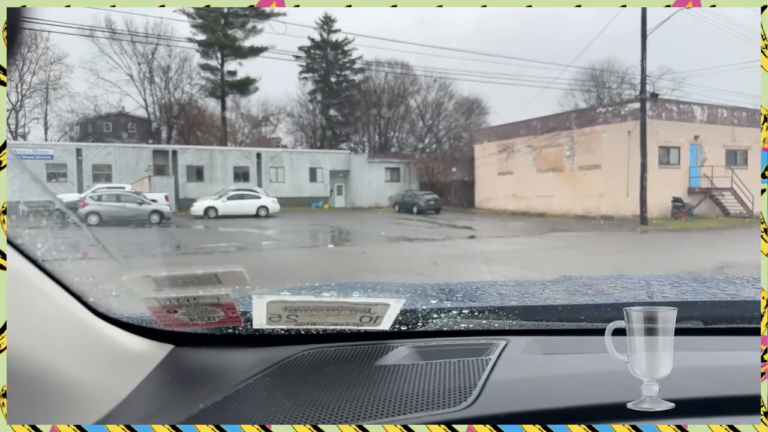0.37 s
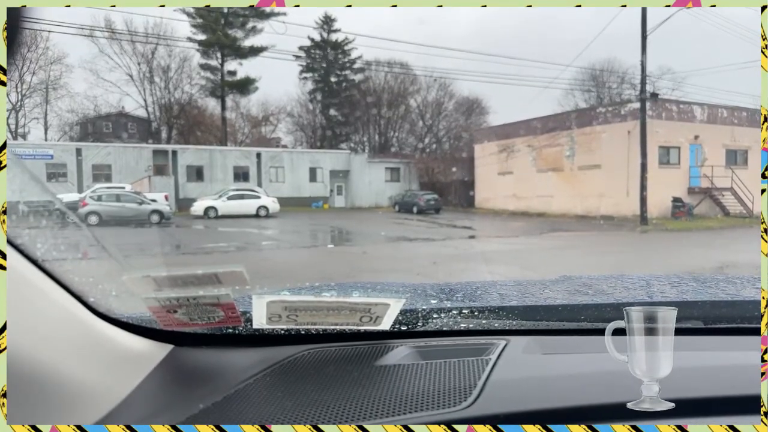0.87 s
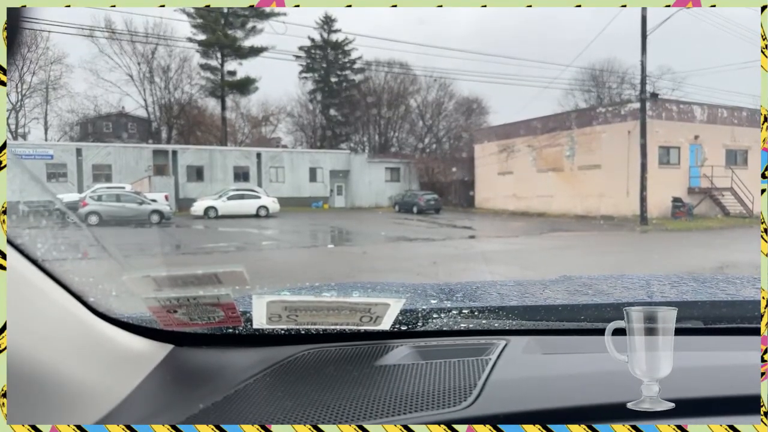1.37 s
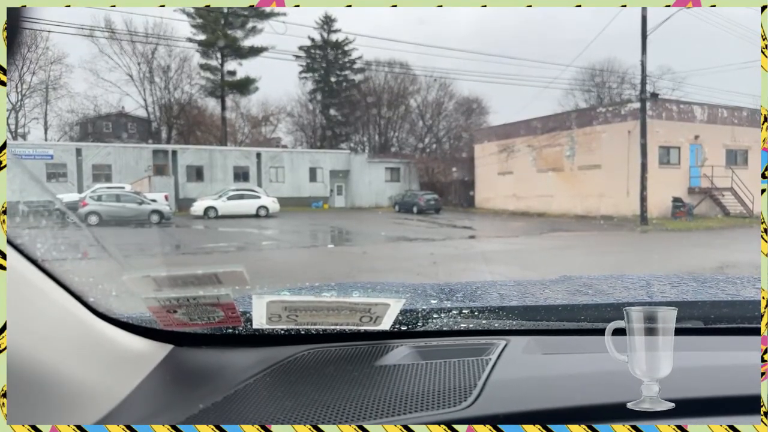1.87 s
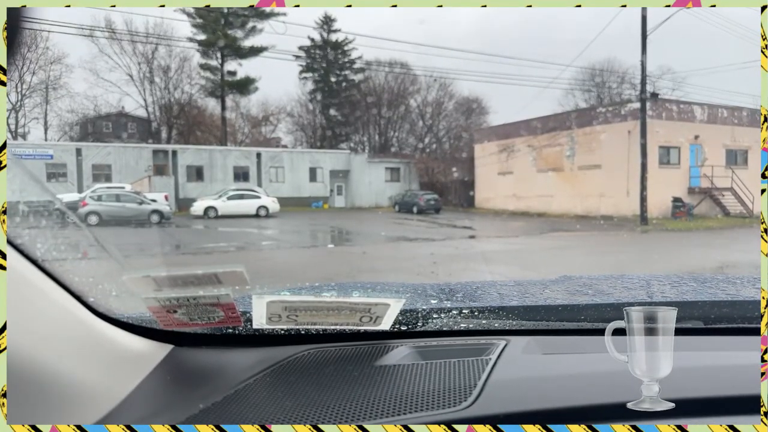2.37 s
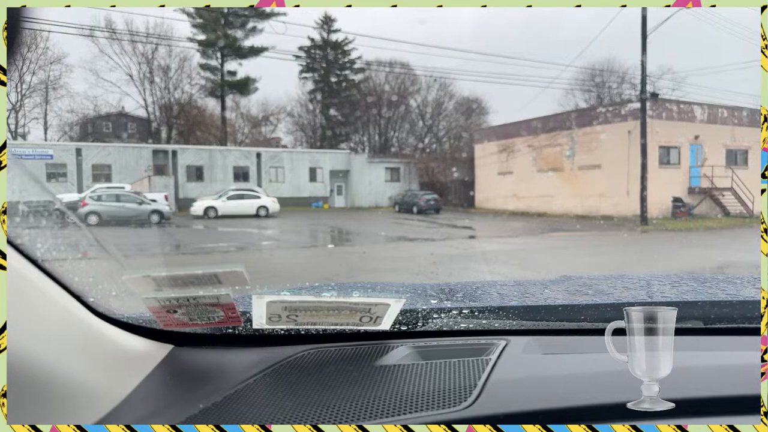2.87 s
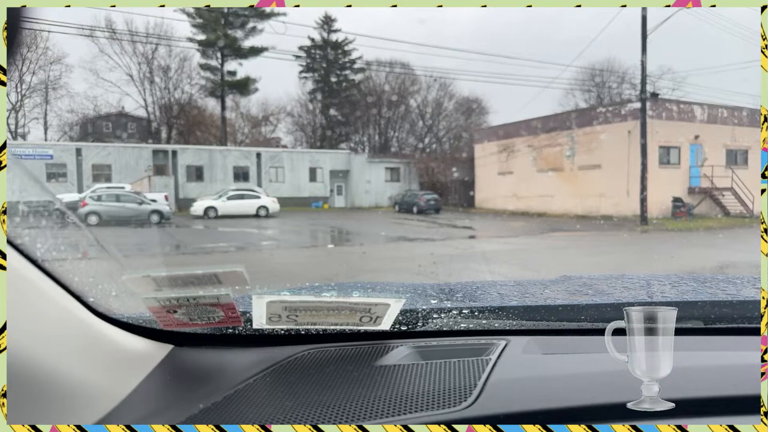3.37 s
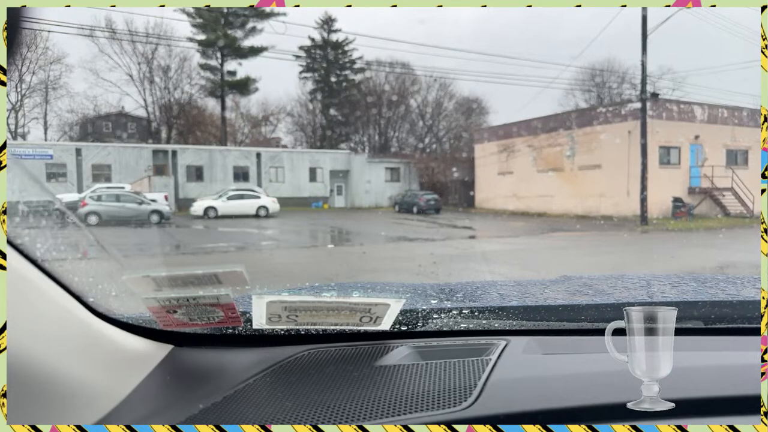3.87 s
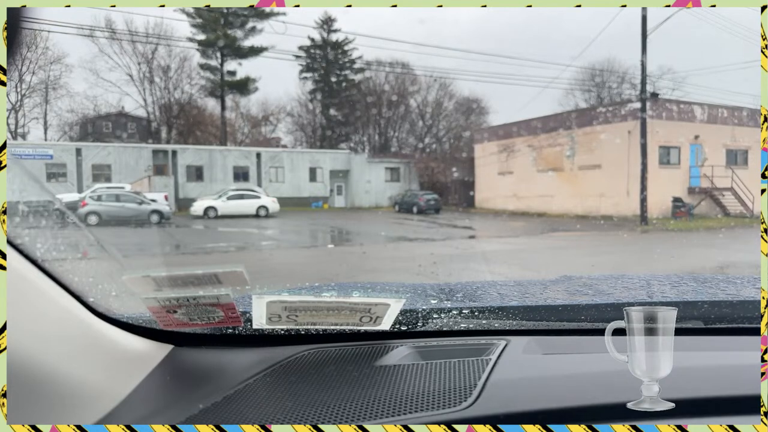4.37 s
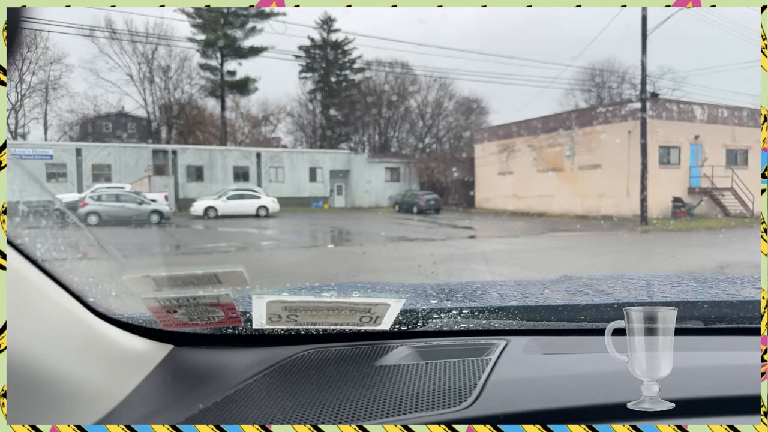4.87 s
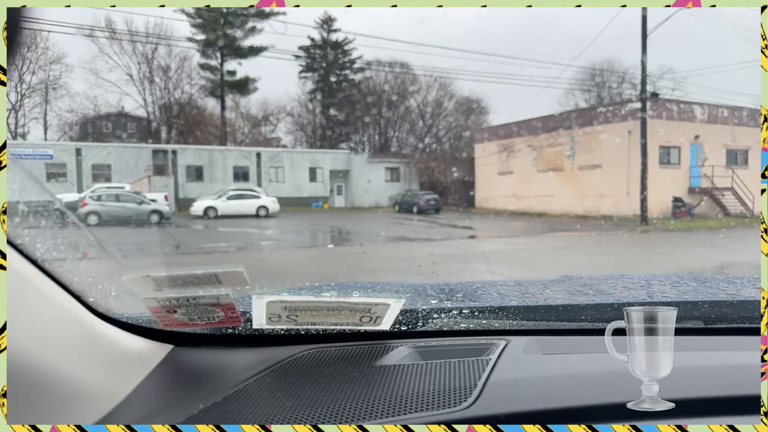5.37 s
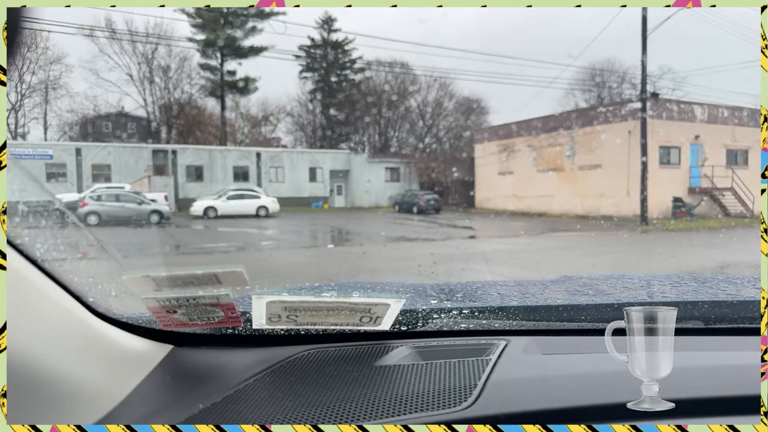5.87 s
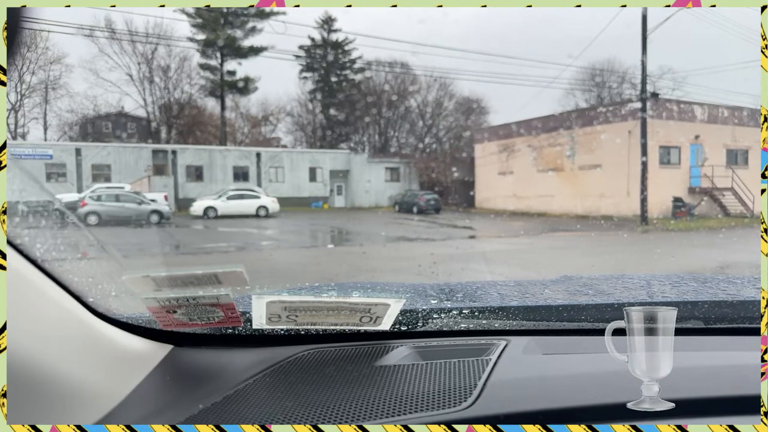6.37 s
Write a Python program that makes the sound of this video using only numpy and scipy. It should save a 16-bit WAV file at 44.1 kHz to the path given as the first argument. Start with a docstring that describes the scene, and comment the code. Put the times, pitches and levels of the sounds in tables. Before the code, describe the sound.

Heard from inside a small, padded car cabin, a deep engine idle hums throughout over dull rumble. Light rain patters very faintly on roof and glass, with scattered bigger drops. From about two seconds a stiff jacket rustles, scuffs and briefly squeaks close to the phone microphone, then eases into shorter strokes. A sharp, bright drop cracks near five and a half seconds.

```python
"""A deep firing drone with a few orders over a dull rumble: an engine idles, heard inside a parked car.
Light rain patters faintly on roof and glass as clicked panel modes; bigger drops tap those modes
together and tick as bursts of bright noise. Near the microphone a stiff jacket rustles, scuffs and
squeaks in short strokes of grainy noise and resonances; once a thin whine of ringing noise flickers."""
import sys
import numpy as np
from scipy import signal
from scipy.io import wavfile

SR = 44100
rng = np.random.default_rng(int(sys.argv[2]) if len(sys.argv) > 2 else 0)


def unload_wav(signal):
    """Save mono or channel-first audio to the path in sys.argv[1] as 16-bit WAV at rate SR, clipped to [-1, 1]."""
    wavfile.write(
        sys.argv[1],
        SR,
        np.round(np.clip(np.atleast_2d(signal).T, -1, 1) * 32767).astype(np.int16),
    )


def level_to_linear(level):
    """Convert decibel levels to linear amplitude factors, elementwise."""
    exponent = np.asarray(level, float) / 20
    return 10 ** exponent


N = 286870

# modes of the roof and glass panels: (frequency [Hz], t60 [s])
PANEL_MODES = [(62, .15), (108, 0.11), (150, 0.12), (240, 0.032), (300, .04), (370, 0.05), (445, 0.03),
               (620, 0.032), (680, .025), (750, .045), (880, 0.015), (1015, 0.03), (1150, 0.015),
               (1300, 0.02), (1500, 0.022), (1650, .015), (1800, 0.018), (2050, 0.014), (2300, 0.025),
               (2750, 0.02), (3100, 0.02), (3700, 0.0081), (4400, 0.012), (4750, .016), (5050, 0.02),
               (5350, 0.018), (5600, 0.016), (5850, .012), (6200, 0.011)]


def rms_one(x):
    """Scale to unit rms."""
    return x / np.sqrt(np.mean(x ** 2) + 1e-20)


def in_time(rows):
    """Columns of a table as curves over all samples."""
    s, *columns = np.transpose(rows)
    return [np.interp(np.arange(N) / SR, s, column) for column in columns]


def drift(rate):
    """Slow chance of spread 1: noise smoothed by two poles, computed at every 40th sample."""
    pole = np.exp(-80 * np.pi * rate / SR)
    noise = rng.standard_normal(N // 40 + 2002)
    slow = signal.lfilter([1], [1, -2 * pole, pole * pole], noise)[2000:]
    return np.interp(np.arange(N) / 40, np.arange(len(slow)), rms_one(slow))


def bands(spectrum, source, flicker_db, flicker_rate, count=3):
    """Slices (count per octave) of two unrelated sources, each with its colour and flicker: (Hz, slice)."""
    hz, db = np.transpose(spectrum)
    top_hz = min(hz[-1], 16500)
    edges = np.geomspace(hz[0], top_hz, int(count * np.log2(hz[-1] / hz[0])))
    for k, (low, high) in enumerate(zip(edges, edges[1:])):
        mid = np.sqrt(low * high)
        band = signal.butter(2, [low, high], "band", fs=SR, output="sos")
        cut = signal.sosfilt(band, source[k % 2])
        colour_db = np.interp(np.log(mid), np.log(hz), db)
        yield mid, cut * level_to_linear(colour_db + flicker_db * drift(flicker_rate))


def ring(push, hz, t60):
    """One decaying mode; a unit click gives a sine that starts at height 1."""
    r, w = level_to_linear(-60 / (t60 * SR)), 2 * np.pi * hz / SR
    return signal.lfilter([0, np.sin(w)], [1, -2 * r * np.cos(w), r * r], push + 1e-18)


def swell(s, rise, fall, db):
    """Strokes that rise to a peak and fall, summed in power, as a gain over all samples."""
    roundness = 1.5      # 1 = pointed stroke, 2 = bell-shaped
    t = np.arange(0, N + 40, 40) / SR
    shape_db = db - 20 * np.where(t < s, (s - t) / rise, (t - s) / fall) ** roundness
    return np.interp(np.arange(N) / SR, t, np.sqrt(np.sum(level_to_linear(2 * shape_db), axis=0)))


def engine():
    """Firing orders as sines; uneven combustion makes the upper ones waver."""
    # the revs jump once and settle while the drone sinks: (time [s], firing rate [Hz], drone level [dB])
    idle = [(0, 26.8, -38.3), (.5, 26.9, -39.5), (1.25, 27, -38.6), (1.75, 27.3, -39.8), (2.0, 28.7, -39),
            (2.5, 27.8, -41.2), (3.0, 27.7, -40.5), (3.5, 27.2, -43), (3.75, 27.5, -41.3),
            (4.1, 26.9, -42.5), (4.6, 27.3, -41.7), (5.0, 26.8, -42.3), (5.5, 26.7, -43.7),
            (6.0, 27.1, -42.7), (6.5, 27.1, -43)]
    # engine orders: (multiple of the firing rate, level re the first [dB], waver [dB]);
    # a positive waver dips further than it swells, a negative one the reverse
    orders = [(1, 0, -1), (1.5, -20.5, 2), (2, -13.5, 2.5), (3, -26.5, 6), (4, -28, 3), (5, -25, 1.5),
              (6, -31, -1), (7, -37.5, 2)]
    hz, db = in_time(idle)
    turn = 2 * np.pi * np.cumsum(hz) / SR
    out = 0
    for multiple, order_db, waver_db in orders:
        wander = .25 * (multiple - 1) * drift(1.08) + rng.uniform(0, 2 * np.pi)
        level = level_to_linear(order_db + waver_db * np.clip(drift(4.0), -3, 1.5))
        out = out + level * np.sin(multiple * turn + wander)
    return np.sqrt(2) * level_to_linear(db) * out


def rumble():
    """Body panels and vents pass the engine's noise into the cabin, with a rough hum."""
    # colour of cabin rumble and vent hiss: (frequency [Hz], relative level per Hz [dB])
    colour = [(22, -15.5), (38, -7.5), (50, -1), (70, -13), (100, -10.5), (146, -14.5), (210, -16.5),
              (290, -20.5), (367, -21.5), (499, -32), (580, -24), (650, -28), (750, -29), (850, -35),
              (970, -37), (1055, -48), (1170, -36), (1330, -42), (1620, -45), (2030, -42), (2320, -44),
              (2600, -48), (2990, -50.5), (8890, -58.5), (16000, -69.5)]
    # rumble and hiss together: (time [s], level [dB])
    rumble_level = [(0, -57), (1.5, -56), (3, -55.5), (4.5, -56.5), (6.5, -54.5)]
    # a hum under the bonnet that sinks away when the revs jump: (time [s], level [dB])
    hum_level = [(0, -68.5), (.9, -68.5), (1.7, -66.5), (2.0, -74), (2.3, -87), (6.5, -80.5)]
    hum_hz, hum_t60_s = 364.5, 0.044
    slices = bands(colour, rng.standard_normal((2, N)), flicker_db=2.05, flicker_rate=4.7, count=6)
    noise = rms_one(sum(cut for hz, cut in slices))
    once = ring(rng.standard_normal(N), hum_hz, hum_t60_s)
    hum = rms_one(ring(once, hum_hz, hum_t60_s))
    return level_to_linear(in_time(rumble_level)[0]) * noise + level_to_linear(in_time(hum_level)[0]) * hum


def patter():
    """Faint drops, too many to count, each ringing one panel mode picked by chance."""
    drops_per_s, least_db = 300.0, -85
    falls = rng.random(N) < drops_per_s / SR
    small = falls * level_to_linear(least_db + 2.5 * np.minimum(rng.exponential(1, N), 4))
    lands = rng.integers(5, 18, N)      # only the modes from 370 to 2050 Hz
    return sum(ring(small * (lands == k), *mode) for k, mode in enumerate(PANEL_MODES))


def cabin(x):
    """Small upholstered space: a short, dense tail, thin in the bass."""
    t60_s = 0.085
    t = np.arange(SR // 4) / SR
    thin = signal.lfilter([1, -.9], [1, -.6], rng.standard_normal(len(t)))
    tail = thin * level_to_linear(-60 * t / t60_s) * (t > .002)
    return signal.fftconvolve(x, tail / np.sqrt(np.sum(tail ** 2)))[:N]


def jacket():
    """Fibres slipping over fibres: dense tiny snaps; each stroke swells, dies and has its own dullness."""
    # cloth colour: (frequency [Hz], relative level per Hz [dB])
    colour = [(410, 3), (700, -21), (1230, -20.5), (1310, -12), (1770, -14), (2160, -16), (2900, -9),
              (3500, -5.5), (4300, -6), (5300, -4), (6300, -5.5), (7200, -6), (8200, -3), (9000, -1.5),
              (10000, -4), (10700, -5), (11500, -4), (12500, -3.5), (13500, -3), (15000, -3), (16000, -6)]
    # strokes: (time of peak [s], rise by 20 dB [s], fall by 20 dB [s], hiss level [dB], dullness [dB])
    strokes = [(0.521, 0.627, 0.18, -78.8, -1.2), (0.824, 0.115, 0.12, -81.2, 1.2),
               (0.993, 0.052, 0.438, -83.4, 0.4), (1.523, 0.22, 0.613, -80.7, 0.8),
               (1.627, 0.086, 0.044, -74.0, -1.8), (1.725, 0.161, 0.22, -72.9, 0.3),
               (1.831, 0.092, 0.043, -69.7, -0.8), (1.9, 0.345, 0.488, -81.0, -0.6),
               (2.108, 0.044, 0.045, -68.7, -0.4), (2.17, 0.026, 0.037, -74.1, -1.6),
               (2.252, 0.162, 0.033, -76.2, -4.4), (2.386, 0.148, 0.116, -80.8, 0.1),
               (2.476, 0.028, 0.079, -61.6, 0.1), (2.598, 0.151, 0.055, -66.8, -3.9),
               (2.693, 0.1, 0.44, -66.8, -2.6), (2.82, 0.06, 0.044, -62.5, 0.5),
               (2.867, 0.029, 0.059, -61.3, -1.3), (2.961, 0.09, 0.043, -59.1, -3.8),
               (3.053, 0.168, 0.032, -64.3, -2.1), (3.13, 0.068, 0.164, -69.5, 0.5),
               (3.275, 0.066, 0.197, -65.8, 1.1), (3.339, 0.223, 0.041, -64.7, -5.7),
               (3.585, 0.112, 0.143, -56.6, -4.0), (3.699, 0.205, 0.025, -65.8, -11.9),
               (3.79, 0.09, 0.106, -66.5, -0.7), (4.039, 0.4, 0.886, -82.9, -0.1),
               (4.385, 0.11, 0.351, -82.9, 4.0), (4.587, 0.02, 0.181, -71.6, -3.9),
               (4.71, 0.108, 0.095, -64.6, -5.0), (4.812, 0.12, 0.187, -76.2, 3.2),
               (4.955, 0.072, 0.134, -72.1, -1.0), (5.051, 0.044, 0.268, -77.4, 1.1),
               (5.244, 0.075, 0.136, -72.0, -4.5), (5.305, 0.055, 0.044, -72.2, -4.7),
               (5.415, 0.1, 0.1, -80, -3), (5.503, 0.05, 0.04, -80, 11), (5.506, 0.033, 0.406, -68.6, 0.1),
               (5.63, 0.134, 0.134, -75.5, -18.5), (5.74, 0.058, 0.123, -68.9, -12.4),
               (6.002, 0.041, 0.189, -83.1, 0.1), (6.122, 0.054, 0.068, -74.7, 2.4),
               (6.359, 0.412, 0.548, -88.5, 4.6)]
    s, rise, fall, db, dull_db = np.transpose(strokes)[:, :, None]
    snaps = rng.standard_normal((2, N)) * level_to_linear(3.2 * np.minimum(rng.exponential(1, (2, N)), 5))
    slices = list(bands(colour, snaps, flicker_db=1.6, flicker_rate=30.0, count=5))

    def level(colour_db):
        return swell(s, rise, fall, db + colour_db)

    def part(low_hz, high_hz):
        return rms_one(sum(cut for hz, cut in slices if low_hz <= hz < high_hz))

    hiss = level(0) * part(6500, 11000)
    sizzle = level(-1.8 - .12 * dull_db) * part(11000, 2e4)
    swish = level(dull_db) * part(2800, 6500)
    # the bottom of the cloth grows more slowly than the hiss, from -70 dB
    rub = level(-1.8 + .95 * dull_db - .45 * (db + 70)) * part(0, 2800)
    return level_to_linear(1.1 * drift(120.0)) * (hiss + sizzle + swish + rub + scuffs(part))


def scuffs(part):
    """A sleeve scuffs the seat, dull and rough: low cloth noise that catches unevenly."""
    # scuffs: (time of peak [s], rise by 20 dB [s], fall by 20 dB [s], level [dB], lowest frequency [Hz])
    scuff_rows = [(1.78, .45, .3, -77, 1600), (2.81, .14, .08, -70, 900), (3.64, .3, .15, -75, 1450),
                  (3.8, .05, .1, -76, 1450), (4.7, .07, .1, -76, 1450), (4.965, .04, .04, -79, 1450),
                  (5.5, .07, .035, -69, 1300), (5.71, .05, .05, -75, 1050)]
    catch = level_to_linear(4.0 * drift(150.0))      # 4 dB of grain
    out = 0
    for *stroke, low_hz in scuff_rows:
        out = out + swell(*np.array(stroke)[:, None, None]) * part(low_hz, 2350) * catch
    return out


def taps():
    """A drop pushes unevenly for a few ms and rings the panel modes nearest its own pitch."""
    # dull taps: (time [s], peak level [dB], centre of ringing [Hz], spread [octaves], contact [s])
    tap_rows = [(1.665, -56, 2600, 0.77, .004), (1.728, -46.5, 105, .4, 0.035),
                (2.032, -47, 430, 0.3, 0.0012), (2.079, -50, 680, 0.28, 0.002), (2.092, -57, 620, .2, .002),
                (2.109, -55, 520, 0.25, 0.003), (2.12, -60, 750, .2, .002), (2.1705, -49, 1550, 0.3, .0025),
                (2.176, -55, 650, .25, .003), (2.487, -56, 1500, 0.73, .01), (2.596, -56, 3500, 0.67, .006),
                (2.905, -41, 100, 0.7, 0.015), (2.959, -51, 760, 0.2, 0.0029), (3.134, -42, 144, 0.4, 0.01),
                (3.169, -47, 54.95, .4, 0.024), (3.336, -48.5, 190, .5, .01), (3.26, -49, 1500, 0.6, 0.008),
                (3.268, -49, 1100, .8, .005), (3.326, -54, 400, 0.5, 0.0048), (3.34, -52, 780, .3, .003),
                (3.752, -54, 550, .3, .002), (3.7618, -40, 600, 0.35, 0.0008),
                (3.762, -43, 370, .12, .0006), (3.7655, -35, 630, 0.2, 0.0006),
                (3.7635, -46, 1700, .8, .004), (3.775, -51, 1000, .5, .003), (3.781, -50, 680, .3, .002),
                (3.77, -52, 149.3, 0.77, 0.021), (4.6235, -51, 1700, 0.98, 0.005),
                (4.629, -54, 900, .5, .01), (4.633, -52, 3000, 1.2, .005), (4.795, -57, 702, 0.93, 0.0056),
                (5.102, -52, 1788, 0.9, 0.0046), (5.555, -54, 2200, .9, .003), (5.558, -52, 560, .5, 0.006),
                (5.5765, -38, 1000, 1.3, 0.002), (5.577, -40, 750, .15, .004), (5.582, -38, 3300, .3, .003),
                (5.575, -40, 100, .3, .006), (5.5823, -31, 5350, 0.14, .0035),
                (5.587, -39, 5150, .14, .016), (5.581, -36.5, 1100, 1.3, .006), (5.592, -49, 450, .6, .006),
                (5.623, -54, 1500, .4, .005), (5.607, -41, 850, 1.1, 0.0065),
                (5.607, -39, 105, 0.35, 0.006), (5.688, -57, 1400, .5, .01), (5.699, -55, 600, 0.6, 0.008),
                (5.709, -53, 750, 0.7, 0.008), (5.724, -55, 600, .6, .01), (5.727, -59, 1900, .3, .003),
                (6.108, -53, 1400, .4, .002), (6.114, -57, 1700, .3, .001), (6.12, -57, 1900, .3, .001),
                (6.125, -54, 1200, .8, .005), (6.138, -57, 1500, .4, .003), (6.154, -51, 1800, .6, .002),
                (6.158, -55, 900, .6, .006)]
    out, hz = np.zeros(N + SR), np.transpose(PANEL_MODES)[0]
    click = np.arange(SR // 4) == 0
    modes = np.array([ring(click, *mode) for mode in PANEL_MODES])
    chance = rng.standard_normal((len(tap_rows), len(PANEL_MODES) + 5))
    for (s, db, centre_hz, spread, contact), luck in zip(tap_rows, chance):
        off = np.log2(hz / centre_hz) / spread
        blow = level_to_linear(-6 * off ** 2 + 2.2 * luck[5:]) @ modes      # all modes start together: a sharp front
        # a contact is five fading jolts
        jolts = np.zeros(round(contact * SR) + 1)
        places = (np.linspace(0, 1, 5) ** 1.324 * (len(jolts) - 1)).astype(int)
        np.add.at(jolts, places, np.sign(luck[:5]) * level_to_linear(-1.5 * np.arange(5)))
        # water is soft: little far from its pitch
        edges = centre_hz * 2 ** (np.array([-1, 1]) * (spread + .25))
        soft = signal.butter(2, edges, "band", fs=SR, output="sos")
        blow = signal.sosfilt(soft, np.convolve(blow, jolts))
        at = round(s * SR)
        out[at:at + len(blow)] += level_to_linear(db) * blow / np.abs(blow).max()
    return out[:N]


def ticks():
    """A drop bursts on the glass: a sharp crack, then bright spray that dies at once."""
    # bright splats: (time [s], nominal level [dB], spray t60 [s], lowest frequency [Hz])
    splats = [(2.083, -60, .04, 4000), (2.4575, -52.5, .08, 3500), (2.598, -60, 0.035, 3000),
              (2.881, -53, .015, 7000), (3.337, -47, .04, 5000), (3.764, -47.5, 0.083, 5000),
              (4.5815, -63, .08, 5998), (4.624, -57, .03, 2500), (4.633, -48, 0.025, 2999),
              (5.1031, -42, 0.03, 4370), (5.109, -52, 0.034, 5000), (5.2874, -56, .05, 11000),
              (5.492, -62, .01, 6000), (5.5332, -26, 0.011, 14000), (5.534, -46, .03, 7500),
              (5.5765, -57, .04, 2500), (5.5822, -21.5, 0.018, 11500), (5.5823, -29, .02, 2500),
              (5.587, -39, 0.085, 1500), (5.8215, -56.5, 0.044, 3000), (6.108, -63, .015, 3000),
              (6.119, -58, .04, 2993), (6.1542, -56, 0.028, 2500)]
    out, t = np.zeros(N + SR), np.arange(SR // 4) / SR
    crack = level_to_linear(-60 * t / 0.0094)
    onset = np.minimum(t / 0.00028, 1)
    for s, db, t60, low_hz in splats:
        bright = signal.butter(3, low_hz, "high", fs=SR, output="sos")
        spray = signal.sosfilt(bright, rng.standard_normal(len(t)))
        shape = (level_to_linear(-60 * t / t60) + crack) * onset
        at = round(s * SR)
        out[at:at + len(t)] += level_to_linear(db - 9.5) * shape * rms_one(spray)      # 9.5 dB: noise peaks over rms
    return out[:N]


def squeaks():
    """Coated cloth sticks and slips for a moment: a rough stack of three partials."""
    # squeaks: (time [s], length [s], slip rate [Hz], level [dB], tilt per partial [dB])
    squeak_rows = [(2.449, 0.058, 5000, -63.5, -17), (2.793, .045, 2200, -58.5, -2.5),
                   (2.81, .03, 4500, -59, -30), (2.857, 0.013, 3150, -56, -9),
                   (2.808, .014, 9770, -60, -30), (2.866, .04, 8750, -59, -30),
                   (2.868, .035, 12500, -60, -30), (3.048, .015, 7300, -62, -8.0)]
    out = np.zeros(N)
    for s, length, hz, db, tilt_db in squeak_rows:
        at, size = round(s * SR), round(length * SR)
        rough = rng.standard_normal((3, 4000))
        stack = 0
        for k in range(3):
            partial = ring(rough[k], min((k + 1) * hz, 16000), 0.009)
            stack = stack + level_to_linear(k * tilt_db) * rms_one(partial)
        out[at:at + size] += level_to_linear(db) * np.hanning(size) * stack[-size:]
    return out


def whine():
    """Breathy tones, noise through narrow resonances, flicker in and out, each on its own."""
    # a faint thin whine, tone by tone: (frequency [Hz], start [s], length [s], level [dB])
    tone_rows = [(2240.0, 4.8, .45, -90), (2760.0, 4.8, .3, -84), (2650.0, 5.05, .22, -84),
                 (3800.0, 4.8, .25, -84), (3720.0, 5.02, .23, -83), (4560.0, 4.79, .28, -82.5),
                 (6030.0, 4.75, .25, -87)]
    t60_s = .022      # of each of the two resonances in a row
    out = 0
    for hz, s, length, db in tone_rows:
        along = np.clip((np.arange(N) / SR - s) / length, 0, 1)
        shape = np.abs(np.sin(np.pi * along)) ** .3 * (along < 1)
        tone = rms_one(ring(ring(rng.standard_normal(N), hz, t60_s), hz, t60_s))
        out = out + level_to_linear(db + 2.5 * drift(8.0)) * shape * tone
    return out


def scene():
    """Drops sound in the cabin, its tail 9.5 dB down; drone, rumble, cloth and whine are close."""
    drops = patter() + taps() + ticks()
    rain = drops + level_to_linear(-9.5) * cabin(drops)
    return (engine() + rumble() + rain + jacket() + squeaks() + whine())[None]


def band_limit(x):
    """A steep low-pass at the top of the band."""
    return signal.sosfilt(signal.butter(12, 16510, fs=SR, output="sos"), x)


def record(dry):
    """A phone microphone: its sound port resonates, lifting the treble around 9 kHz."""
    port_hz, port_t60_s, port_db = 9000.0, 0.0031, -10
    on_top = 2 * (1 - level_to_linear(-60 / (port_t60_s * SR)))      # gain 1 at the resonance
    resonance = np.gradient(ring(dry, port_hz, port_t60_s), axis=1)
    finished = dry + level_to_linear(port_db) * on_top * resonance
    return band_limit(finished)


dry = scene()
out = record(dry)
unload_wav(out)
```